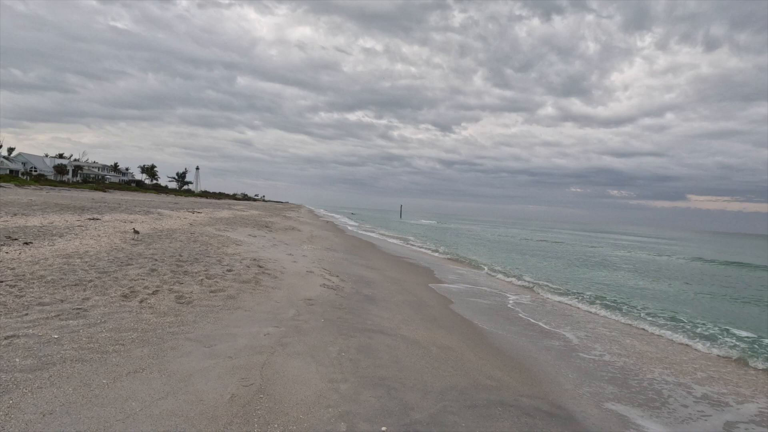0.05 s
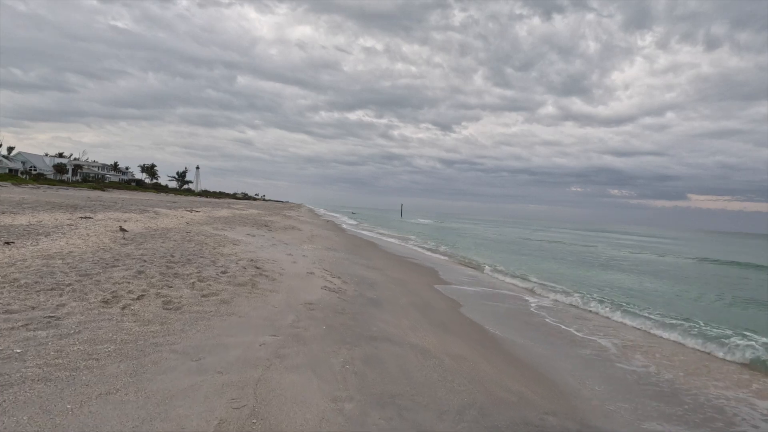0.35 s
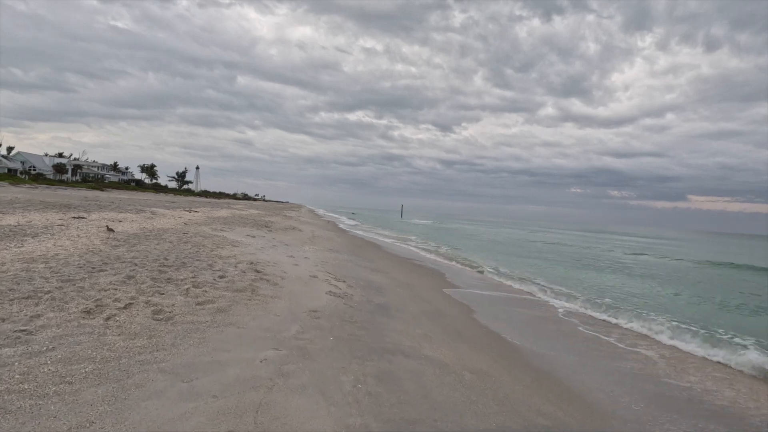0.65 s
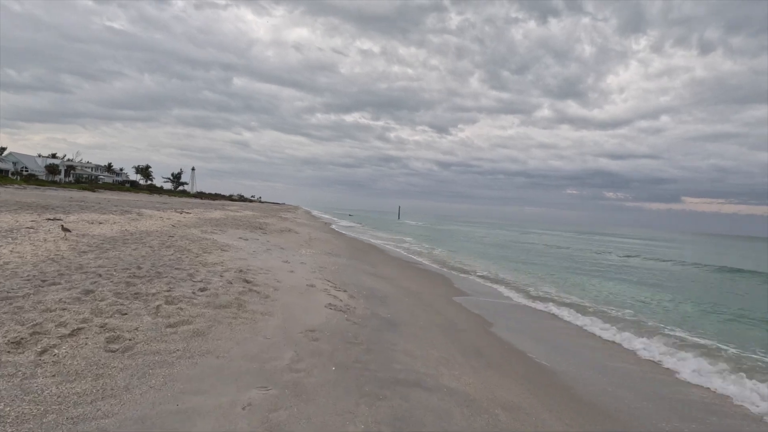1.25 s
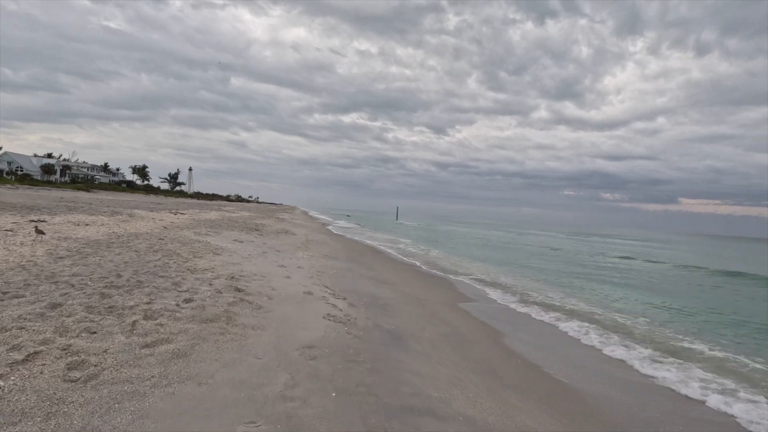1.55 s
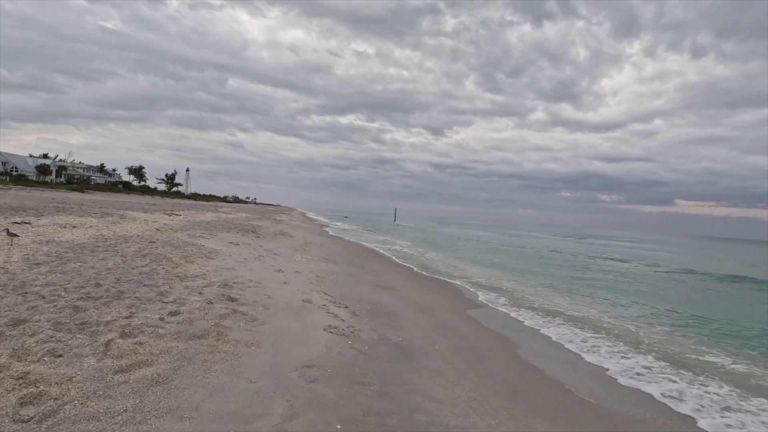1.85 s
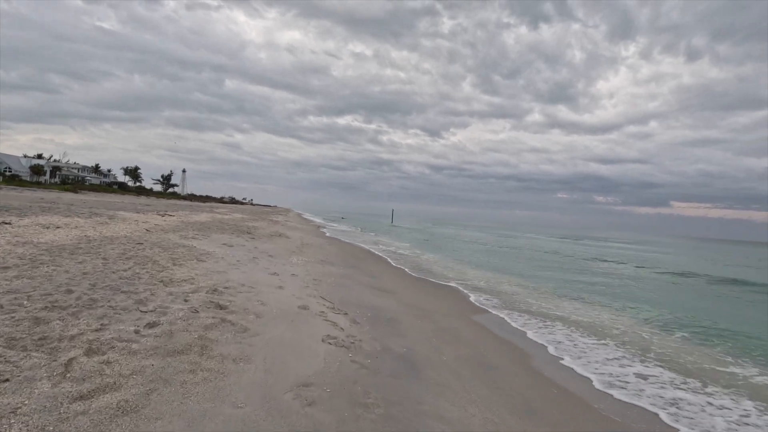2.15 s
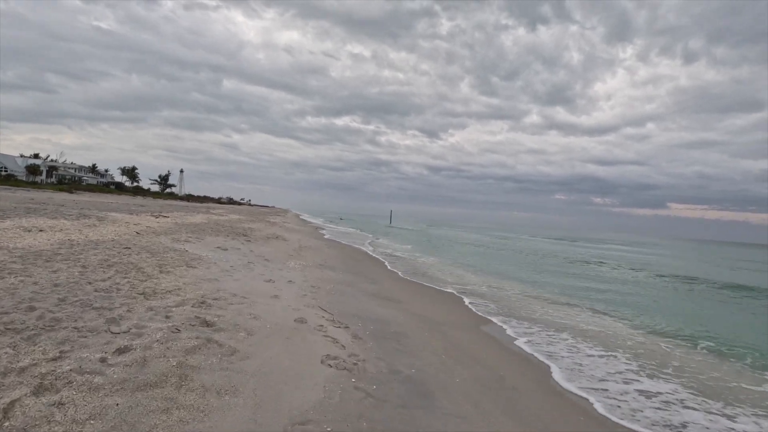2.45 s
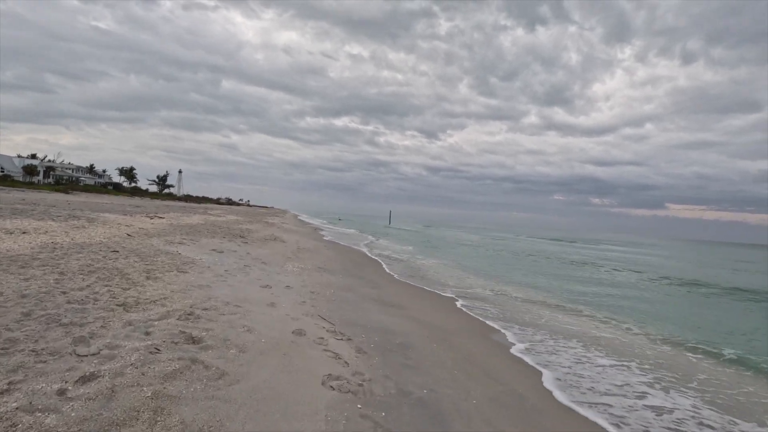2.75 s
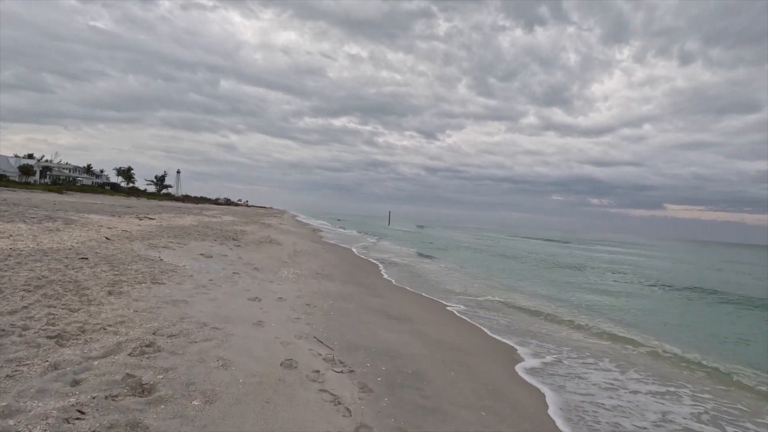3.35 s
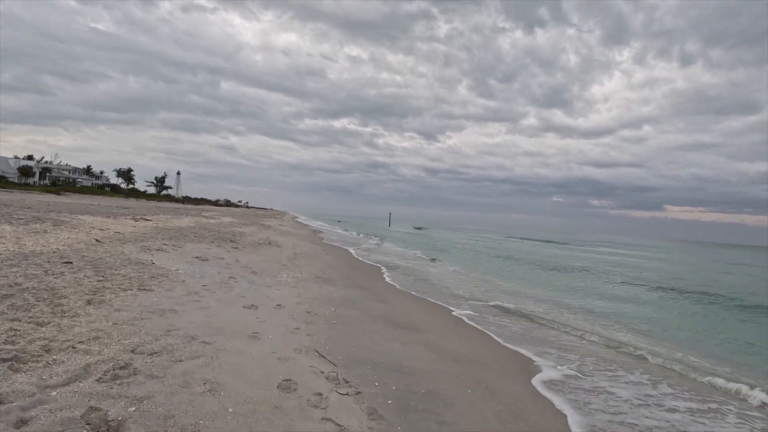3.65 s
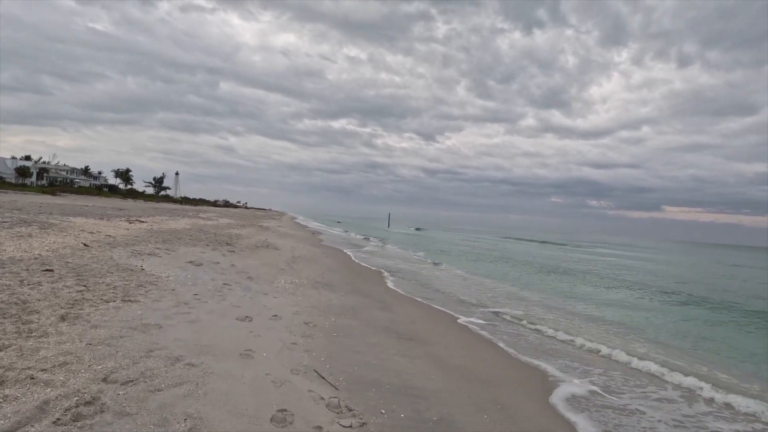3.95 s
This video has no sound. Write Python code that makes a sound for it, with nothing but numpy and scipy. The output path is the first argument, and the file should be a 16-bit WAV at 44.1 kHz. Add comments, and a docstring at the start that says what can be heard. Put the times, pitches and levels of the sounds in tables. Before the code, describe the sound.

Small waves break on a sandy beach, slightly to the right. The first builds with hiss and pattering droplets, peaking around 1 second in a bubbling churn with gulps and a dull thud. From about 1.8 to 3.1 seconds it ebbs to thin wash and faint crackling foam. A second wave breaks at 3.3 seconds, churning until 4. Distant surf and light wind on the microphone continue throughout.

```python
"""A sandy beach: two small waves break to the right, with a lull of thin wash between them.
Each crest spills with a hiss and a patter of droplets, churns into a roar of bubbles and rumbles
as it collapses; trapped air gulps and thuds. Foam crackles on the sand.
Behind it all, far surf murmurs along the shore and a light wind nudges the microphone."""
import sys
import numpy as np
from scipy import signal
from scipy.fft import rfft, irfft, next_fast_len
from scipy.io import wavfile
from scipy.ndimage import uniform_filter1d, map_coordinates

SR = 44100
rng = np.random.default_rng(int(sys.argv[2]) if len(sys.argv) > 2 else 0)


def output_pcm(signal):
    """Save a mono or channel-first signal as 16-bit PCM at the path in sys.argv[1].

    Samples are clipped to [-1, 1] before scaling.
    """
    pcm = np.clip(np.atleast_2d(signal).T, -1, 1) * 32767
    wavfile.write(sys.argv[1], SR, np.round(pcm).astype(np.int16))


N = 176400
TOP_HZ = 14600

# Stereo width of the water. Each row: frequency in Hz, likeness of left and right from 0 to 1.
STEREO_LIKENESS = [(100, .99), (500, .98), (1350, .95), (2000, .88), (4000, .78), (5500, .52), (8000, .12),
                   (10000, .18), (13000, .45)]
# Direction of the sea. Each row: frequency in Hz, phase of left minus right in radians.
SEA_PHASE = [(100, 0), (160, -.6), (300, -.9), (520, -1.05), (1400, -1.0), (2000, -.8), (3000, -.8),
             (4200, -.95), (6500, -1.1), (8300, -3.7), (13000, -6.2)]
# Balance of the waves and of the far surf. Each row: frequency in Hz, left minus right in dB.
WAVE_BALANCE = [(40, 0), (70, 3.5), (115, 3.5), (270, -.4), (650, -2), (1200, .5), (3000, .4), (6000, .3),
                (9000, 4.2), (11800, 5.5), (13500, 0)]
SURF_BALANCE = [(100, 1.5), (600, .8), (1500, 15), (3000, 6.4), (6000, 5.1), (12000, 8)]
# Tone colour of each layer. Each row: frequency in Hz, relative level in dB.
WIND_EQ = [(3, -2), (12, -9), (22, -12.5), (40, -13), (80, -30), (160, -61), (600, -85)]
SURF_EQ = [(40, -12), (80, -3.5), (150, 1), (280, -2), (450, -23), (650, -14), (920, -10), (1300, -15.5),
           (2200, -17.5), (4000, -21), (7000, -28), (10000, -42.5), (12000, -42), (14400, -59)]
WAVELET_EQ = [(120, 4), (300, -2), (600, -10), (780, 5.5), (950, 5.5), (1150, -5), (1500, 0), (2400, -15),
              (4000, -36)]
THUD_EQ = [(25, -12), (55, -6), (75, -1), (110, 8), (170, -11), (500, -57)]
DROPLET_EQ = [(1500, -8), (4000, 0), (6000, -5), (9000, -8), (12000, -8), (14500, -24)]
COLLAPSE_EQ = [(30, -45), (65, -4.5), (110, -4.5), (200, -0.5), (330, 0.5), (480, -3), (620, -8),
               (1000, -18.5), (3000, -56)]
CHURN_EQ = [(100, -36), (300, -9.5), (520, 0.5), (700, 0), (950, 2.5), (1400, -0.5), (2000, -5.5),
            (3000, -15.5), (4500, -27), (9000, -51)]
SPRAY_EQ = [(700, -13.5), (2000, 1.5), (3000, 3.5), (4200, -3), (5500, -9.5), (7300, -14), (8600, -21),
            (10800, -26), (12100, -20.5), (13200, -35), (14500, -51)]
# Fader rides for the gusts and the breakers. Each row: time in seconds, level in dB before the trim.
WIND_FADER = [(0, -42.5), (0.3, -44.5), (0.39, -27), (0.52, -44.5), (0.92, -36.5), (1.15, -44), (1.42, -39),
              (1.62, -43.5), (1.8, -36.5), (1.92, -34.5), (2.03, -43), (2.24, -46), (2.33, -38),
              (2.45, -41), (2.7, -45), (2.87, -37.5), (3.1, -42.5), (3.37, -38), (3.5, -43.5), (4, -43)]
COLLAPSE_FADER = [(0, -39), (0.22, -38.5), (0.31, -31.5), (0.52, -35.5), (0.63, -29.5), (0.75, -27),
                  (0.9, -26), (1.08, -24), (1.17, -26.5), (1.35, -31.5), (1.68, -45), (2.2, -42),
                  (3.15, -41.5), (3.35, -36), (3.55, -37), (3.72, -28), (3.88, -27), (4, -27.5)]
CHURN_FADER = [(0, -36), (0.25, -32), (0.42, -29), (0.6, -27.5), (0.77, -24.5), (0.97, -23.5), (1.1, -25.5),
               (1.2, -28), (1.5, -32.5), (1.85, -41), (2.25, -47), (2.7, -43.5), (3.1, -44.5),
               (3.25, -38.5), (3.42, -31), (3.62, -28), (3.82, -28.5), (4, -28.0)]
SPRAY_FADER = [(0, -43), (0.22, -44), (0.42, -39.5), (0.52, -41.5), (0.59, -35), (0.8, -36.5),
               (0.98, -35.5), (1.17, -38), (1.35, -40.5), (1.75, -46), (2.1, -53), (2.7, -56.5),
               (3.05, -53.5), (3.21, -47), (3.33, -39.5), (3.6, -39.5), (3.8, -39.5), (4, -39.5)]
# The breaking point runs off along the beach, then the next wave starts close by.
# Each row: time in seconds, left minus right in dB.
BREAK_PAN = [(0, 0.5), (.7, -0.2), (1.1, 0), (1.55, 1), (1.85, 2.5), (2.6, 1), (3.2, 2.5), (3.45, .5),
             (4, 0)]
# Close ticks on the sand. Each row: start in seconds, pitch in Hz, pitch spread in Hz, level in dB.
FOAM_TICKS = [(1.976, 11900, 4500, -50.5), (2.091, 10400, 200, -62), (2.446, 9300, 500, -65),
              (2.447, 11330, 300, -66)]
# Dull thuds of air under a crest. Each row: start in seconds, pitch in Hz, level in dB.
AIR_THUDS = [(0.931, 66.5, -38), (3.3, 74, -35), (3.773, 74, -35)]
# Gulps of large air pockets. Each row: time of the peak in seconds, pitch in Hz, level in dB.
AIR_GULPS = [(0.183, 818, -31), (0.705, 258, -32), (0.859, 516, -23), (1.074, 473, -24), (1.167, 301, -29),
             (1.21, 430, -27), (3.506, 1076, -31), (3.617, 1248, -25), (3.839, 344, -32), (3.884, 258, -27)]
# Bursts of droplets. Each row: start in seconds, level in dB.
SPLASH_HITS = [(0.55, -48), (0.72, -42), (0.92, -47), (1.26, -47), (1.73, -59), (2.24, -55), (3.29, -49),
               (3.72, -51)]


def amp(db):
    """Decibels to gain."""
    return 10 ** (np.asarray(db) / 20)


def unit(x):
    """Scaled to rms 1."""
    return x / np.sqrt(np.mean(x ** 2) + 1e-20)


def along(points, hz):
    """(Hz, value) points read on a log axis."""
    f, v = np.transpose(points)
    return np.interp(np.log(hz + 1), np.log(f + 1), v)


def curve(rows):
    """(seconds, value) points as one value per sample."""
    return np.interp(np.arange(N) / SR, *np.transpose(rows))


def wobble(rate):
    """A smooth random curve, rate knots a second."""
    knots = rng.standard_normal(int(N * rate / SR) + 4)
    return map_coordinates(knots, [np.arange(N) * rate / SR])


def filtered(x, response):
    """x through a filter given as a complex response of frequency."""
    size = next_fast_len(N + SR // 2)
    return irfft(rfft(x, size) * response(np.fft.rfftfreq(size, 1 / SR)), size)[..., :N]


def pan(side_db):
    """Left and right gains for a level difference, left minus right."""
    return amp(np.array([[.5], [-.5]]) * side_db)


def from_sea(x, balance=WAVE_BALANCE):
    """Sound from the sea reaches the right side of the microphone first."""
    phase = lambda hz: np.array([[.5], [-.5]]) * along(SEA_PHASE, hz)
    return filtered(x, lambda hz: pan(along(balance, hz)) * np.exp(1j * phase(hz)))


def rush(eq, patchy_db, balance=WAVE_BALANCE):
    """Stereo water noise of rms 1, mottled by patches of random gain in time and frequency."""
    spectra = signal.stft(rng.standard_normal((2, N)), nperseg=512)[2]
    patches = uniform_filter1d(rng.standard_normal(spectra.shape[1:]), size=6, axis=0)
    patches = unit(uniform_filter1d(patches, size=9, axis=1))
    pair = signal.istft(spectra * amp(patchy_db * patches), nperseg=512)[1][:, :N]
    width = lambda hz: np.arccos(np.clip(along(STEREO_LIKENESS, hz), 0, 1)) / 2
    mid, side = filtered(pair, lambda hz: amp(along(eq, hz)) * [np.cos(width(hz)), np.sin(width(hz))])
    return unit(from_sea(np.array([mid + side, mid - side]), balance))


def bubbles(per_s, centre_hz, cycles, spread, size_db, rise):
    """A cloud of short ringing bubbles, each rising in pitch as it dies; rms 1."""
    when, radius, angle, size = np.hsplit(rng.random((int(per_s * N / SR), 4)), 4)
    normal = np.sqrt(-2 * np.log(1 - radius)) * np.cos(2 * np.pi * angle)  # bell-curve scatter
    hz = np.clip(centre_hz * np.exp(spread * normal), 150, TOP_HZ)
    offsets = np.arange(SR // 30)
    age = hz * offsets / SR / cycles
    gain = amp(-size_db * np.log(1 - .99 * size))  # many quiet, a few loud
    envelope = gain * np.exp(-2 * age) * (1 - np.exp(-age * cycles))
    rings = envelope * np.sin(2 * np.pi * cycles * age * (1 + rise * age / 2))
    positions = (when * N).astype(int) + offsets
    return unit(np.bincount(positions.ravel(), rings.ravel(), N)[:N])


def wind(trim_db=-1, apart_db=-10):
    """Eddies buffet the microphone: a soft, very low rumble, nearly alike on both sides."""
    eddies = rng.standard_normal(N) + amp(apart_db) * rng.standard_normal((2, N))
    rumble = filtered(eddies, lambda hz: amp(along(WIND_EQ, hz)))
    power = uniform_filter1d(np.mean(rumble ** 2, axis=0), size=SR // 8)
    levelled = unit(rumble / np.sqrt(np.abs(power)))  # so the fader shapes the gusts
    return amp(curve(WIND_FADER) + trim_db) * levelled


def far_surf(murmur_db=-43.5, wavelet_db=-44, peak_s=2.84, half_width_s=0.28):
    """A steady bed of surf farther along the beach, where one wavelet spills during the lull."""
    murmur = amp(murmur_db + 0.47 * wobble(5.86)) * rush(SURF_EQ, patchy_db=1.5, balance=SURF_BALANCE)
    swell = np.exp(-((np.arange(N) / SR - peak_s) / half_width_s) ** 2)
    return murmur + amp(wavelet_db) * swell * rush(WAVELET_EQ, patchy_db=3.5)


def foam(crackle_db=-75.5, tick_t60_s=0.023):
    """Bursting foam crackles on the sand, with a few sharper ticks close by on the left."""
    crackle = bubbles(per_s=600, centre_hz=7900, cycles=4.7, spread=0.33, size_db=2.0, rise=.03)
    t = np.arange(N) / SR
    ticks = np.zeros(N)
    for start, hz, spread_hz, db in FOAM_TICKS:
        age = np.maximum(t - start, 0)
        ticks += amp(db - 60 * age / tick_t60_s) * np.sin(2 * np.pi * hz * age) * wobble(spread_hz)
    return amp(crackle_db) * crackle * pan(side_db=4) + ticks * pan(side_db=17)


def thuds(attack_s=0.038, hold_s=0.027, t60_s=0.76, waver_rad=0.55, rumble_db=-4.5):
    """A falling crest traps a pocket of air, which throbs briefly in a low rumble."""
    t = np.arange(N) / SR
    out = np.zeros((2, N))
    for start, hz, db in AIR_THUDS:
        age = t - start
        fade_db = -60 * np.maximum(age - attack_s - hold_s, 0) / t60_s
        throb = from_sea(unit(np.sin(2 * np.pi * hz * age + waver_rad * wobble(40))))
        rumble = amp(rumble_db) * rush(THUD_EQ, patchy_db=4.5)
        out += amp(db + fade_db) * np.clip(age / attack_s, 0, 1) * (throb + rumble)
    return out


def gulps(half_width_cycles=9.7, waver_cycles=4.6):
    """Larger air pockets ring out of the white water, swelling and dying within a few dozen cycles."""
    t = np.arange(N) / SR
    out = np.zeros(N)
    for peak_s, hz, db in AIR_GULPS:
        cycle = hz * (t - peak_s)
        phase = 2 * np.pi * cycle + wobble(hz / waver_cycles)
        out += amp(db) * np.exp(-(cycle / half_width_cycles) ** 2) * np.sin(phase)
    return from_sea(out)


def splashes(attack_s=.03, t60_s=0.75):
    """Where a crest first hits the water it throws up a crisp patter of droplets."""
    t = np.arange(N) / SR
    envelope = np.zeros(N)
    for start, db in SPLASH_HITS:
        age = np.maximum(t - start, 0)
        envelope += amp(db - 60 * age / t60_s) * np.minimum(age / attack_s, 1)
    drops = np.array([bubbles(per_s=870, centre_hz=5500, cycles=2.2, spread=0.47, size_db=3, rise=.05)
                      for _ in range(2)])
    return envelope * unit(filtered(drops, lambda hz: amp(along(DROPLET_EQ, hz))))


def breakers(surge_db=.35, bubble_db=-10):
    """The near waves: spray hisses, white water churns and bubbles, the collapse rumbles beneath."""
    ride = lambda fader, trim_db: amp(curve(fader) + trim_db + surge_db * wobble(20))
    collapse = ride(COLLAPSE_FADER, trim_db=-2) * rush(COLLAPSE_EQ, patchy_db=0.5)
    cloud = bubbles(per_s=650, centre_hz=1059, cycles=13, spread=0.5064, size_db=6.5, rise=0.081)
    bubbling = amp(bubble_db) * from_sea(cloud)
    churn = ride(CHURN_FADER, trim_db=-1.5) * (rush(CHURN_EQ, patchy_db=0.56) + bubbling)
    spray = ride(SPRAY_FADER, trim_db=0.5) * rush(SPRAY_EQ, patchy_db=1.5)
    return (collapse + churn + spray) * pan(curve(BREAK_PAN))


def scene():
    """The full mix: breakers and their details up front, surf, foam and wind behind."""
    return breakers() + splashes() + gulps() + thuds() + far_surf() + foam() + wind()


def record(dry):
    """A brick-wall high cut on the whole mix."""
    return filtered(dry, lambda hz: hz < TOP_HZ)


dry = scene()
out = record(dry)
output_pcm(out)
```